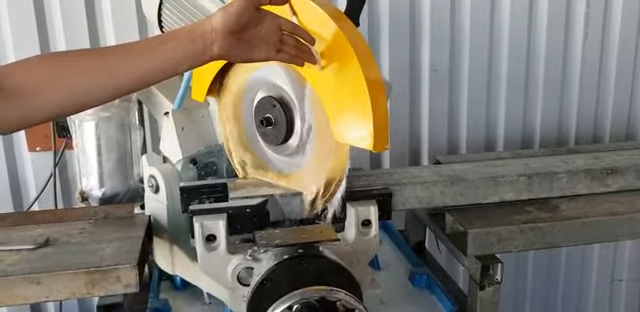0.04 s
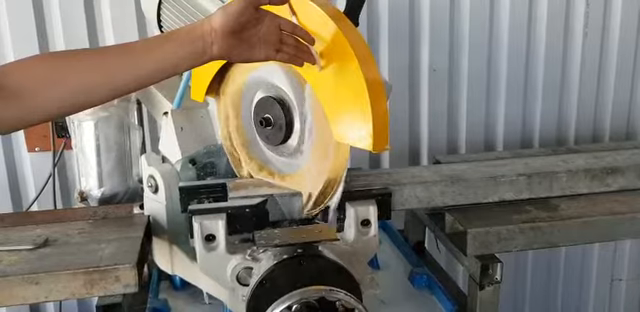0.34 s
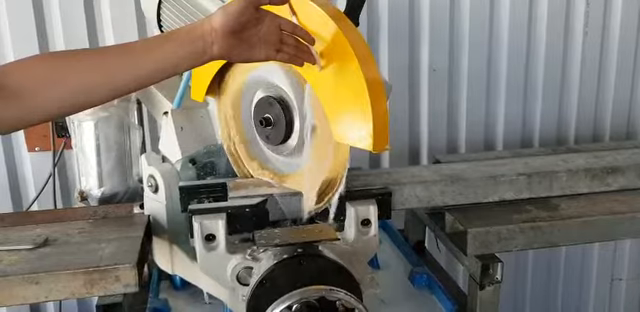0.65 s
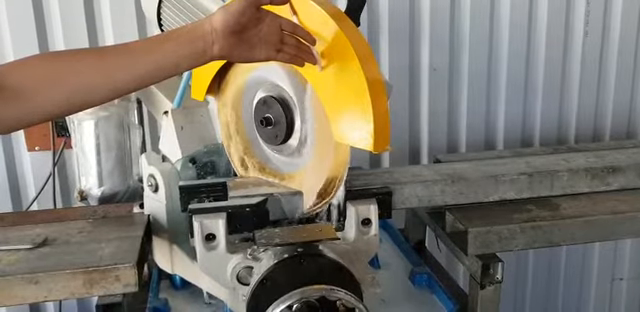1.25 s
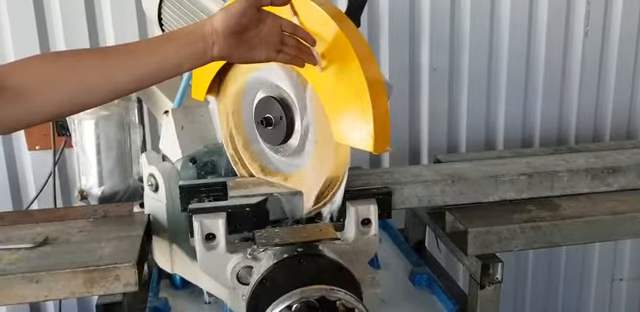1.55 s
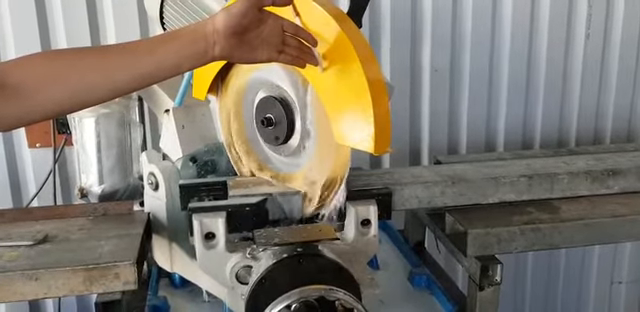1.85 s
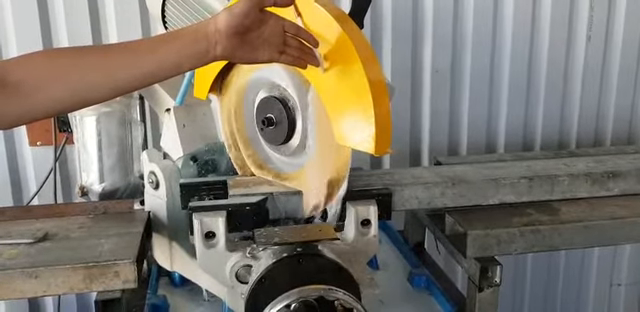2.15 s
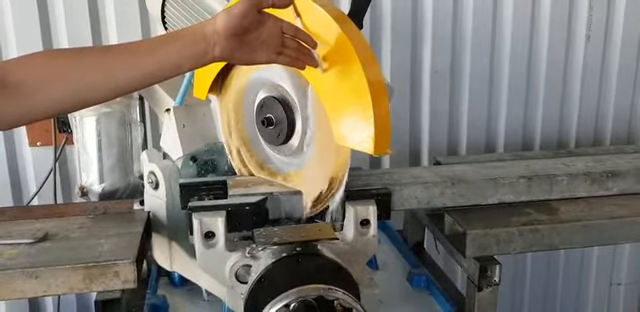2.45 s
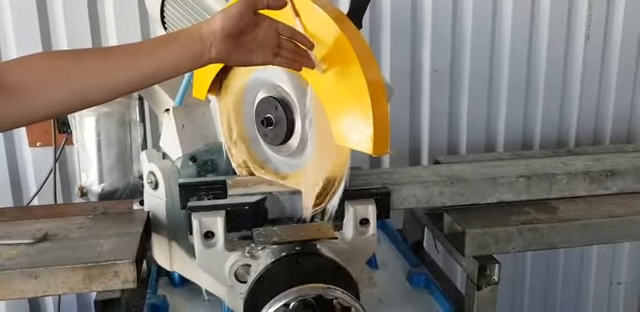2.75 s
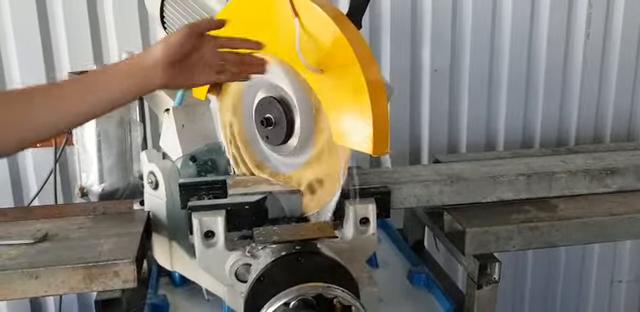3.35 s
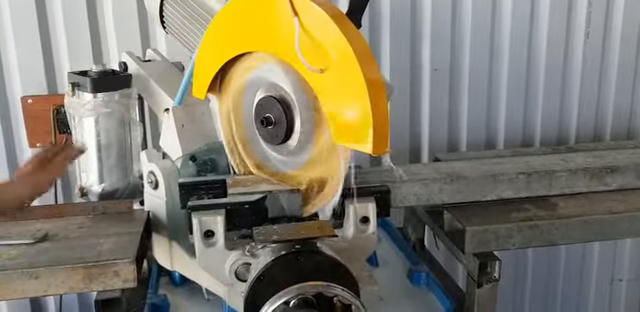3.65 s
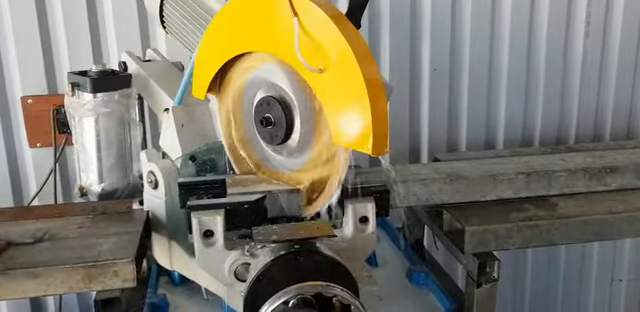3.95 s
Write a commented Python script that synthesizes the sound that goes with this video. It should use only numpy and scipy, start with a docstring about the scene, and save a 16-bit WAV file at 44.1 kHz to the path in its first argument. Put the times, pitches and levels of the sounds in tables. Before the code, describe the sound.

A cut-off saw grinds through a steel bar, then spins freely with a quieter whine.

```python
"""Cut-off saw in a metal workshop

A stereo pair hears a spinning disc grind and snag through a steel bar, then run free after 2.5 s.
In the cut the loaded frame drones on low tones that beat together. Rumble, air noise, a fine hiss and
a gear whine that throbs once a turn carry on throughout. Nearby sheet-metal walls add short echoes."""
import sys
import numpy as np
from scipy.fft import rfft, irfft, next_fast_len
from scipy.io import wavfile
from scipy.ndimage import map_coordinates

SR = 44100
rng = np.random.default_rng(int(sys.argv[2]) if len(sys.argv) > 2 else 0)


def unload_audio(sound):
    """Save the sound as a 16-bit wav file, at the path given as the first command line argument."""
    columns = np.transpose(np.atleast_2d(sound))
    # keep every value between -1 and 1, then stretch to whole-number steps
    steps = np.round(np.clip(columns, -1, 1) * 32767)
    wavfile.write(sys.argv[1], SR, steps.astype(np.int16))


N = 176400
MESH_HZ, TEETH = 524, 39
# spectrum of the low growl and the bumps: frequency_hz, level_db
GROWL_SPECTRUM = [(60, -120), (110, -7), (145, 0.5), (180, -14), (230, 4), (262, 0), (288, -4.5), (325, -5),
                  (362, 1), (400, -8.5), (440, -4.5), (520, -33.5), (1200, -120)]


def cutting(turn):
    """The disc rubs harder once a turn; grit makes the grinding flutter, and snags make it flare."""
    # loudness of the cut: time_s, level_db
    grind_level = [(0, -27), (.15, -27.5), (.24, -29.5), (.39, -28), (.47, -26.5), (.62, -29), (.8, -29),
                   (1.15, -31), (1.3, -31), (1.41, -30), (1.52, -28), (1.78, -31.5), (1.96, -31.5),
                   (2.14, -33.5), (2.4, -38), (2.6, -48.5), (2.85, -46), (4, -80)]
    growl_level = [(0, -34), (.12, -27), (.25, -29), (.45, -29), (.58, -25.5), (.8, -31.5), (1.15, -33.5),
                   (1.3, -38), (1.62, -30), (1.8, -34.5), (2.3, -37.5), (2.55, -49), (2.85, -63), (4, -83)]
    # spectra of disc on steel: frequency_hz, level_db
    grind_spectrum = [(250, -73), (430, -17.5), (492, 3.5), (535, -6), (577, -15), (612, -4), (682, -10),
                      (712, -3), (794, -3), (1040, -8), (1140, -15.5), (1310, -8), (1500, -7.5),
                      (2030, -23), (2450, -21.5), (2640, -27.5), (3200, -32.5), (4160, -41), (7040, -120)]
    snag_spectrum = [(120, -57), (230, 1.5), (370, -6), (490, 8), (600, -15), (810, 5.5), (920, -2),
                     (1130, -13), (1430, -1.5), (1650, -13), (2000, -17), (3200, -29), (4200, -37),
                     (7000, -120)]
    # the disc catches: peak_s, level_db, length_s
    snags = [(.125, -27, .035), (.315, -21, 0.022), (.558, -26.5, 0.017), (.61, -22.5, .03),
             (1.862, -22, 0.018), (1.895, -25.5, 0.042)]
    bite_db = .2 * np.sin(turn) + .52 * wobble(29.83)
    grind = unit(rush(grind_spectrum) * amp(bite_db + 1.44 * wobble(190)))
    growl = unit(rush(GROWL_SPECTRUM) * amp(bite_db + 1.6 * wobble(18) + .85 * wobble(70)))
    flares = swells(snags) * rush(snag_spectrum)
    return amp(curve(grind_level)) * grind + amp(curve(growl_level)) * growl + flares


def frame():
    """The loaded frame's low, wavering tones swell and fade as the cut goes deeper."""
    # frame tones: pitch_hz, waver_hz, [time_s, level_db]
    drones = [ (97.6, 0.62, [(0, -43), (.17, -23.5), (.33, -33.5), (.5, -25), (.9, -26), (1.2, -22),
              (1.5, -27.5), (1.75, -36), (1.95, -42), (2.2, -26.5), (2.35, -29), (2.52, -24.5), (2.68, -44),
              (2.85, -44), (3.1, -58)]), (75.7, 0.081, [(0, -55), (.8, -36.5), (1.2, -29.5), (1.7, -28.5),
              (2.15, -34), (2.4, -40), (2.6, -69)]), (127.5, 1.46, [(0, -23.5), (.17, -25.5), (.35, -35),
              (.5, -30), (.8, -30), (1.2, -37.5), (1.6, -56), (2.5, -65.5)]), (103.16, 0.78, [(0, -51),
              (1.2, -42), (1.6, -30), (2.25, -30.5), (2.6, -43), (3.0, -54)]), (48.3, 0.58, [(0, -52),
              (1, -60), (1.4, -47.5), (1.9, -39), (2.4, -49), (3.6, -44)]), (193, 0.59, [(0, -37.5),
              (1, -40.5), (2.1, -43), (2.55, -44.5), (2.85, -59)]), (271, 0.87, [(0, -39.5), (1, -42),
              (1.4, -33.5), (1.7, -36.5), (2.2, -37), (2.45, -45), (2.6, -66)])]
    return sum(amp(curve(level) + 1.07 * wobble(8.34))
               * tone(hz, np.sin(phase(hz + waver * wobble(4.915))))
               for hz, waver, level in drones)


def disc(turn):
    """The disc hisses with grit and rings; chips tick against the guard, and metal pings once."""
    # loudness of the hiss: time_s, level_db
    hiss_level = [(0, -42), (.4, -43.5), (.6, -43), (.83, -45), (.95, -41), (1.2, -46), (1.7, -42),
                  (2.1, -49.5), (2.42, -47), (2.7, -47), (2.85, -52.5), (3.2, -54), (3.45, -51),
                  (3.7, -50.5), (3.85, -55), (4, -48)]
    # spectrum of hiss and chips: frequency_hz, level_db
    spectrum = [(1500, -61), (2600, -6.5), (3120, -7), (3620, 0.5), (4440, -3.5), (4820, -1.5),
                (5610, -4.5), (6190, -8.5), (6600, -20), (6950, -17.5), (7400, -28), (7750, -24),
                (8100, -37.5), (8500, -23.5), (9100, -25.5), (10000, -13.5), (10700, -13), (11800, -8),
                (14200, -10.5), (15200, -12.5), (15800, -8)]
    # disc resonances: pitch_hz, width_hz, level_db
    modes = [(2480, 60, -62.5), (3590, 130, -63), (4840, 130, -63), (5470, 170, -62.5), (6900, 120, -77),
             (9400, 150, -74.5), (10350, 130, -72), (11230, 170, -77), (12250, 140, -67), (13260, 170, -75),
             (14250, 190, -82), (15150, 220, -84)]
    # chip strikes: start_s, level_db
    chips = [(1.373, -33), (1.385, -40)]
    chip_decay_s, ping_hz = .05, 4980
    t, hiss_db = seconds(), curve(hiss_level)
    grit = amp(.3 * np.sin(turn) + .7 * wobble(45) + 1.9 * wobble(900))
    hiss = amp(hiss_db) * unit(grit * rush(spectrum))
    ring = sum(amp(db) * noise(lambda f: 1 / (1 + (2 * (f - hz) / width) ** 2))
               for hz, width, db in modes)
    ring *= amp(.42 * (hiss_db - hiss_db.mean()))  # partly follows the hiss
    ticks = sum(amp(db - 60 * np.abs(t - s) / chip_decay_s) * (t >= s) for s, db in chips)
    ping = swells([(1.285, -50, .012)]) * tone(ping_hz, rough_sine(2 * np.pi * ping_hz * t, rough=.5))
    return hiss + ring + ticks * rush(spectrum) + ping


def clearing_ring(pitch_hz=1580, width_hz=49):
    """The disc's main resonance sings out, roughly, when the bar no longer damps it."""
    # loudness of the ring: time_s, level_db
    level = [(0, -58), (2.2, -52), (2.55, -51), (2.85, -48.5), (3.0, -56), (3.5, -55), (3.8, -50), (4, -57)]
    return amp(curve(level)) * noise(lambda hz: np.exp(-.5 * ((hz - pitch_hz) / width_hz) ** 2))


def gears(turn):
    """The mesh whines and throbs with each turn of the shaft."""
    # mesh harmonics: multiple, throb_db, roughness, [time_s, level_db]
    harmonics = [ (1, 9.3, 0.11, [(0, -52), (2.3, -54), (2.65, -41), (3.0, -45.5), (3.45, -49),
                 (3.8, -43.5), (4, -41)]), (2, 1.3, 0.28, [(0, -57), (1.45, -43.5), (2.2, -49.5),
                 (2.6, -61)]), (3, 1.2, 0.17, [(0, -59), (2.1, -54), (2.4, -49), (2.68, -40.5),
                 (2.85, -46.5), (3.0, -50.5), (3.45, -52.5), (3.8, -47), (4, -48)])]
    whine = 0
    for k, throb_db, rough, level in harmonics:
        wave = amp(throb_db * np.cos(turn)) * rough_sine(k * TEETH * turn, rough)
        whine += amp(curve(level) + .31 * wobble(5.2)) * tone(k * MESH_HZ, wave)
    return whine


def motor():
    """The motor hums over the rumble of the stand and the air stirred by fan and disc."""
    # steady motor tones: pitch_hz, level_db
    lines = [(59.2, -42), (263.5, -51.5), (301.3, -53.5), (797, -54), (899, -55), (1292, -75.5)]
    # loudness of air and stand: time_s, level_db
    air_level = [(0, -33.5), (2.7, -39), (3.0, -41), (3.25, -41), (3.45, -39.5), (3.7, -40), (3.82, -37.5),
                 (4, -37.5)]
    rumble_level = [(0, -31.5), (2.6, -37), (3.3, -40), (3.7, -37), (4, -39)]
    # their spectra: frequency_hz, level_db
    air_spectrum = [(100, -38), (170, -6), (200, -5.5), (235, -8), (262, -3), (322, -14), (430, -11.5),
                    (470, -9), (520, -4), (570, -10.5), (620, -13), (680, -12), (780, -7), (850, -11),
                    (930, -9), (1010, -11.5), (1130, -19), (1280, -8), (1420, -12.5), (1560, -11.5),
                    (1680, -15), (1790, -20), (2050, -21.5), (2410, -23), (3200, -28), (4160, -53),
                    (7040, -120)]
    rumble_spectrum = [(20, -36), (36, -17), (48, -4), (62, -3.5), (76, -1), (100, 2), (125, -2.5),
                       (155, -1.5), (185, -22), (260, -65), (700, -120)]
    hum = sum(amp(db + 1.4 * wobble(6.01)) * tone(hz, np.sin(phase(hz + 1.1 * wobble(9))))
              for hz, db in lines)
    air = amp(curve(air_level) + .56 * wobble(25.12)) * rush(air_spectrum)
    return hum + air + amp(curve(rumble_level)) * rush(rumble_spectrum)


def bump():
    """One soft, low bump while the saw runs free."""
    # the bump: peak_s, level_db, length_s
    bumps = [(3.825, -43, 0.049)]
    return swells(bumps) * rush(GROWL_SPECTRUM)


def walls(x, count=8, gain=.12, delay_s=(.002, .016), above_hz=950):
    """Nearby metal walls return the treble a little later and ripple its spectrum."""
    size = next_fast_len(N + SR // 2)
    hz = np.fft.rfftfreq(size, 1 / SR)
    echoes = np.zeros((2, size))
    for side in echoes:
        side[(rng.uniform(*delay_s, count) * SR).astype(int)] = gain * rng.choice([-1, 1], count)
    treble = 1 / (1 + (above_hz / (hz + 1)) ** 2)
    response = (1 + treble * rfft(echoes)) / np.sqrt(1 + count * (treble * gain) ** 2)
    return irfft(rfft(x, size) * response, size)[:, :N]


def sides(hz):
    """Left and right gains at the microphones."""
    # stereo balance: frequency_hz, left_over_right_db
    balance = [(60, 2.0), (87, 2.0), (130, 2.0), (180, 1), (260, 3), (380, 2), (550, 7), (790, 2.5),
               (1140, 6), (1650, 9), (2380, 0), (3440, -5.5), (4970, -8.5), (7180, -10), (10400, 3.5),
               (15000, 9.5)]
    lean_db = along(balance, np.atleast_1d(hz)) / 2
    pair = amp([lean_db, -lean_db])
    return pair / np.sqrt(np.mean(pair ** 2, axis=0))


def noise(gain):
    """Stereo noise of rms 1 whose centre follows gain(hz)."""
    # likeness of the two microphones: frequency_hz, correlation
    likeness = [(60, 1.0), (99, 0.98), (160, 1), (270, 0.93), (450, 0.83), (740, 0.73), (1220, 0.39),
                (2010, 0.35), (3330, -0.24), (5500, -0.06), (9080, -0.074), (15000, -0.029)]
    size = next_fast_len(N + 8192)
    hz = np.fft.rfftfreq(size, 1 / SR)
    a, b = rfft(rng.standard_normal((2, size)))
    alike = np.clip(along(likeness, hz), -1, 1)
    spread, pan = np.arccos(alike) / 2, sides(hz)
    mid, side = np.cos(spread) * a, np.sin(spread) * b
    pair = pan * np.array([mid + side, mid - side])
    centre_gain = np.sqrt(1 + alike * pan[0] * pan[1] + 1e-6)
    return unit(irfft(pair * gain(hz) / centre_gain, size)[:, :N])


def rush(spectrum):
    """Stereo noise shaped by (frequency_hz, level_db) rows."""
    return noise(lambda hz: amp(along(spectrum, hz)))


def tone(hz, wave):
    """A wave at rms 1, placed between the microphones."""
    return sides(hz) * unit(wave)


def rough_sine(angle, rough):
    """A sine with a narrow skirt of noise."""
    return np.sin(angle) + rough * (wobble(45) * np.sin(angle) + wobble(45) * np.cos(angle))


def swells(rows):
    """Bell-shaped envelopes from (peak_s, level_db, length_s) rows."""
    return sum(amp(db) * np.exp(-2 * ((seconds() - s) / length) ** 2) for s, db, length in rows)


def wobble(rate):
    """A smooth random curve, rate knots a second."""
    return map_coordinates(rng.standard_normal(int(N * rate / SR) + 4), [np.arange(N) * rate / SR])


def phase(hz):
    """The running angle of a changing frequency, from a random start."""
    return 2 * np.pi * (np.cumsum(hz) / SR + rng.random())


def along(points, hz):
    """(frequency_hz, value) points read on a log axis."""
    freqs, values = np.transpose(points)
    return np.interp(np.log(hz + 1), np.log(freqs + 1), values)


def curve(rows):
    """(time_s, value) points read at every sample."""
    return np.interp(seconds(), *np.transpose(rows))


def seconds():
    """The time of every sample."""
    return np.arange(N) / SR


def amp(db):
    """Decibels to gain."""
    return 10 ** (np.asarray(db) / 20)


def unit(x):
    """Scaled to rms 1."""
    return x / np.sqrt(np.mean(x ** 2) + 1e-20)


def scene():
    """One shaft, slowed a little by the load, paces the cut, the hiss and the gears."""
    # load on the saw: time_s, share_of_full_load
    load = [(0, 0.9), (2.1, 0.91), (2.6, 0.083)]
    sag_hz, throb_peak_s = 1.5, 3.8
    turn = phase((MESH_HZ - sag_hz * curve(load) + .37 * wobble(3.064)) / TEETH)
    turn -= np.interp(throb_peak_s, seconds(), turn)
    return walls(cutting(turn) + motor() + disc(turn)) + frame() + gears(turn) + clearing_ring() + bump()


def record(dry):
    """The recorder keeps nothing above its band limit."""
    top_hz = 15780
    size = next_fast_len(N + SR // 2)
    return irfft(rfft(dry, size) * (np.fft.rfftfreq(size, 1 / SR) < top_hz), size)[:, :N]


dry = scene()
out = record(dry)
unload_audio(out)
```